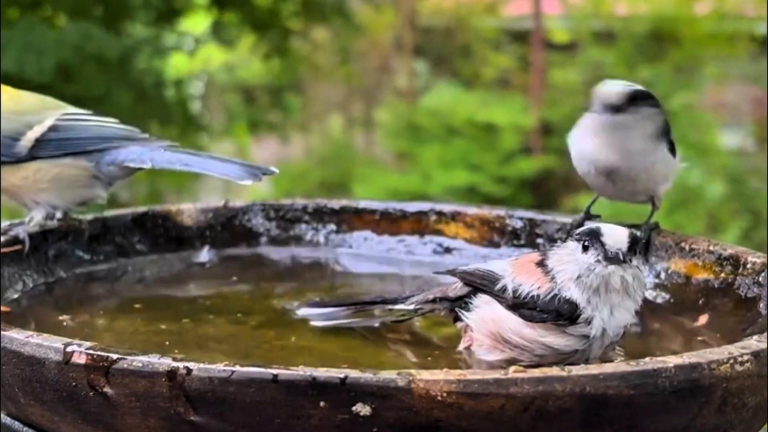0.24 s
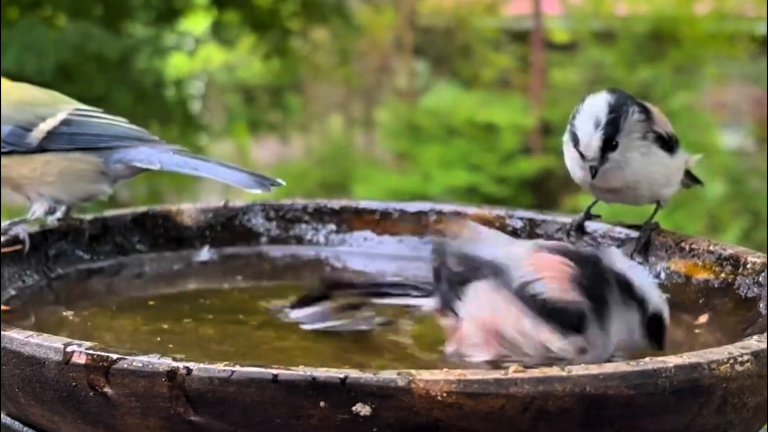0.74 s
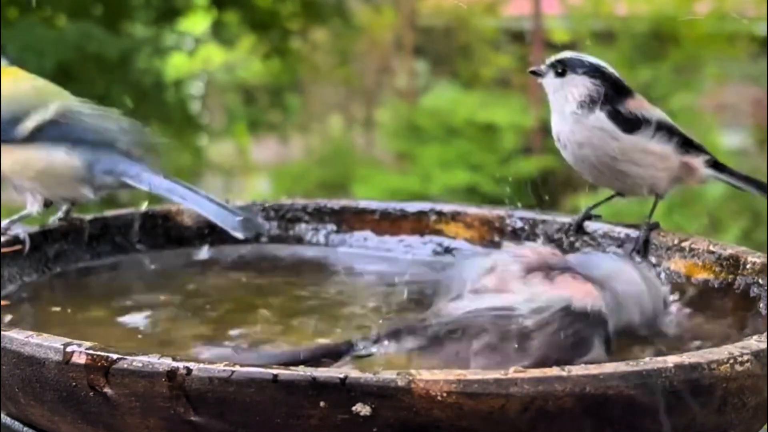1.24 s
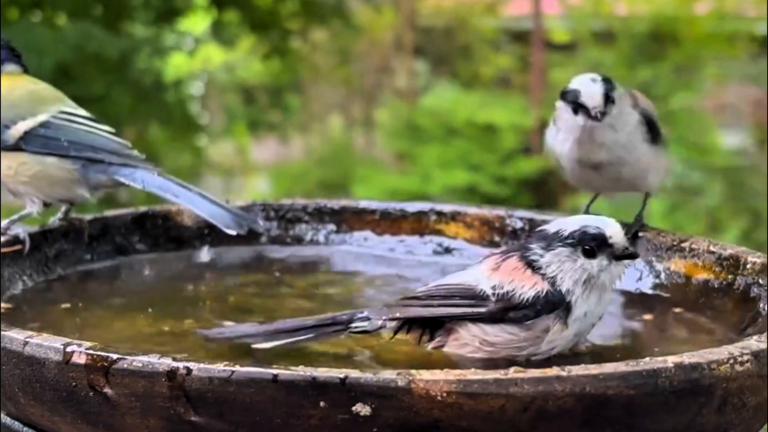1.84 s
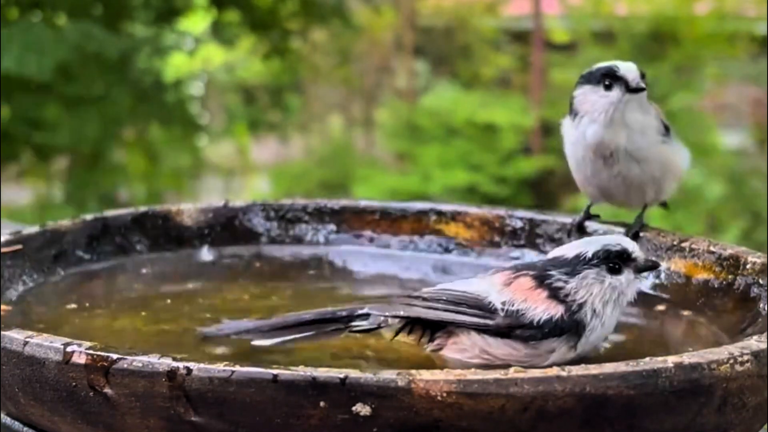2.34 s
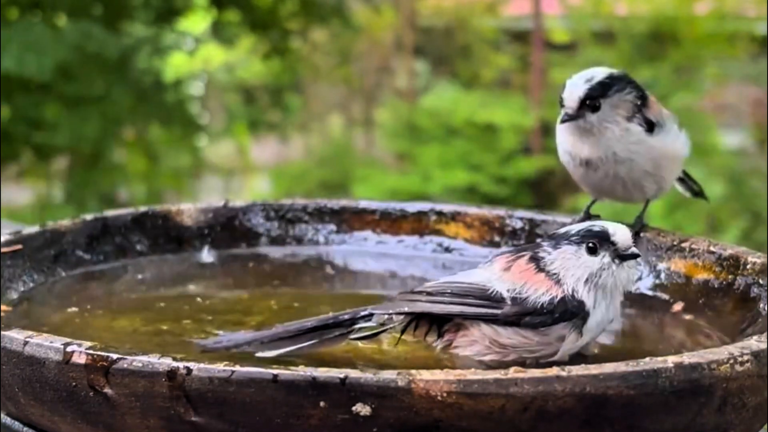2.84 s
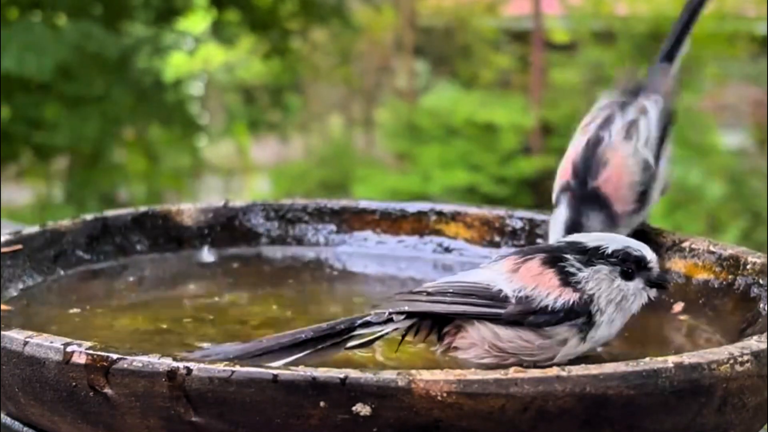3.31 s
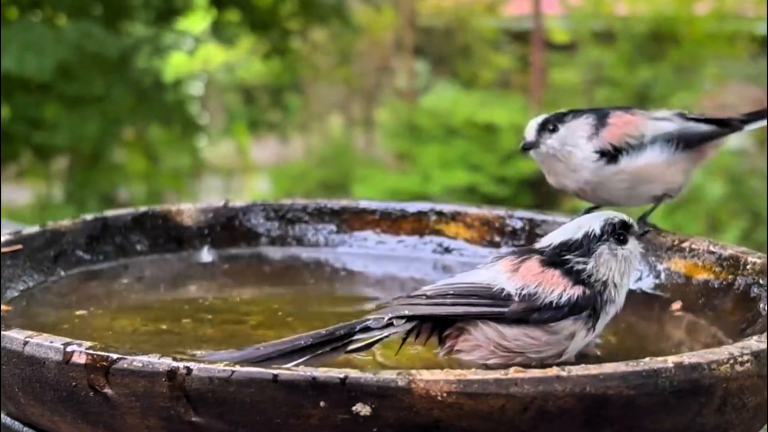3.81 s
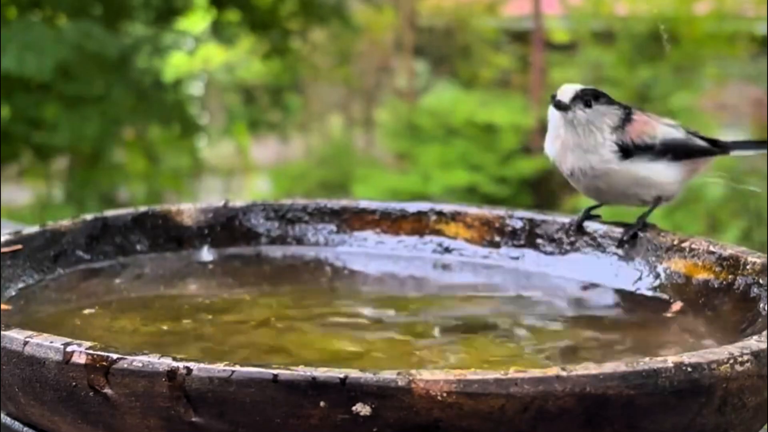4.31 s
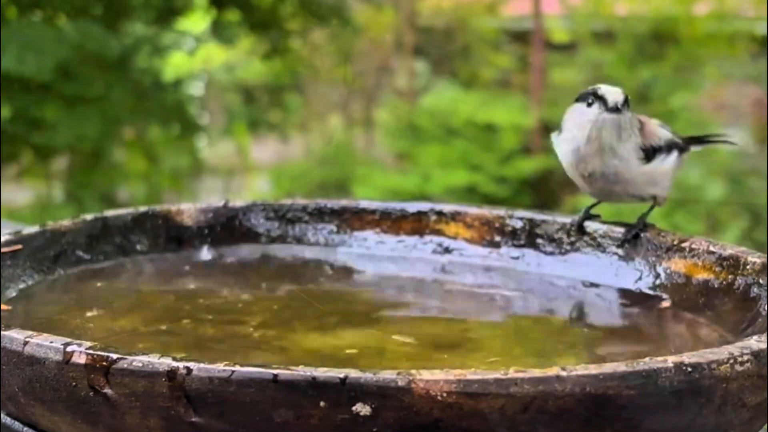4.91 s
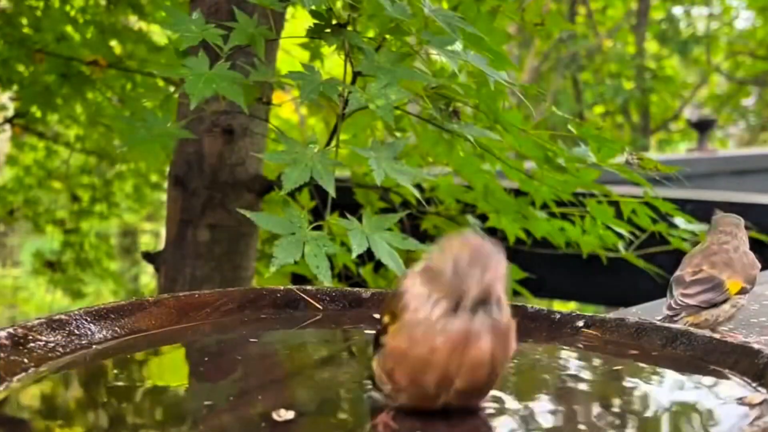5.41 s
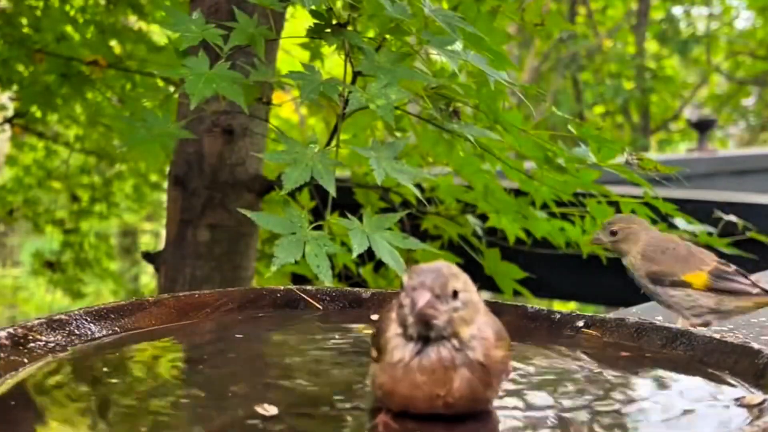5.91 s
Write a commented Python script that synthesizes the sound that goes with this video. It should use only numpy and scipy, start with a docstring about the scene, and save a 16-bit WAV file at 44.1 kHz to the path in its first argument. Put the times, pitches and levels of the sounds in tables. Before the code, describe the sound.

Small songbirds are heard close up at a garden bird bath, over a faint town rumble, soft air and a distant bird chorus. Sharp high chips and thin whistles are scattered through the opening seconds. From about 0.7 seconds a bird splashes, throwing hissing spray and crisp drops. Wings flutter close by at 1.2 seconds and again, with more splashing, around 2.3 seconds. At 3 seconds comes the loudest sound, a clear, very high trill of about a dozen quick notes that falls in pitch and ends near 3.7 seconds. Hoarse, high, distant rasps follow from 3.9 to 5 seconds, while a third flutter passes with spray and drops around 4.3 seconds. Just after 5 seconds the sound drops out for an instant. It returns quieter, with a few light drips and faint whistles until about 6 seconds.

```python
"""Small songbirds at a garden bird bath. Town rumble, air and a far chorus lie under chips and thin whistles.
One bird splashes, throwing hissing spray and cracking drops; wings flap close by at 1.2 s and 2.3 s.
At 3 s comes a loud falling trill, then far rasps and a third flight past the microphone.
Just after 5 s the sound stops for a moment, and a quieter bath is heard."""
import sys
import numpy as np
from scipy import signal
from scipy.fft import rfft, irfft, next_fast_len
from scipy.io import wavfile
from scipy.ndimage import uniform_filter1d, map_coordinates

SR = 44100
rng = np.random.default_rng(int(sys.argv[2]) if len(sys.argv) > 2 else 0)


def log_audio(samples):
    """Write samples as a 16-bit WAV file to the path given in sys.argv[1]."""
    # one column per channel
    frames = np.atleast_2d(samples).T
    # limit to full scale, then quantise
    limited = np.clip(frames, -1, 1)
    pcm = np.round(limited * 32767).astype(np.int16)
    wavfile.write(sys.argv[1], SR, pcm)


N = 271215
TIME = np.arange(N) / SR


def amp(db):
    """Decibels to gain."""
    return 10 ** (np.asarray(db) / 20)


def pan(db):
    """Stereo gains with the left db above the right."""
    return amp([[db / 2], [-db / 2]])


def unit(x):
    """x at rms 1."""
    return x / np.sqrt(np.mean(x ** 2) + 1e-20)


def along(points, hz):
    """Reads a (freq_hz, value) curve on a log frequency axis."""
    freqs, values = np.transpose(points)
    return np.interp(np.log(hz + 1), np.log(freqs + 1), values)


def automation(spans, outside=None):
    """Joins spans of breakpoints into one lane for each column after the time."""
    times, *columns = np.transpose(np.vstack(spans))
    return [np.interp(TIME, times, column, outside, outside) for column in columns]


def wobble(hz, count=N):
    """A smooth random curve with hz knots a second."""
    return map_coordinates(rng.standard_normal(int(count * hz / SR) + 4), [np.arange(count) * hz / SR])


def flutter(hz, count):
    """A wobble of rms 1, for roughening a whistle."""
    return unit(wobble(hz, count))


def filtered(x, response):
    """EQs x with a gain given as a function of frequency."""
    size = next_fast_len(N + SR // 2)
    return irfft(rfft(x, size) * response(np.fft.rfftfreq(size, 1 / SR)), size)[..., :N]


def add(track, start_s, sound):
    """Mixes a sound into a track."""
    room = track[..., round(start_s * SR):][..., :sound.shape[-1]]
    room += sound[..., :room.shape[-1]]


def echoes(x, t60, far_t60, far_db):
    """Leaves and walls scatter a sound: a short tail and a weaker long one, new for each sound."""
    t = np.arange(SR // 2) / SR
    tail = rng.standard_normal((2, len(t))) * (amp(-60 * t / t60) + amp(far_db - 60 * t / far_t60))
    return signal.fftconvolve(x[None], tail / np.linalg.norm(tail[0]), axes=1)


# Stereo image of the noise layers: freq_hz, left_right_correlation
NOISE_IMAGE = [(60, 0.95), (180, 0.85), (550, 0.21), (1650, 0.16), (4970, 0.7), (15000, 0.3)]

def rush(eq, patchy_db, grain=1):
    """Shaped stereo noise of rms 1, its gain varying in random patches of time and frequency."""
    bins = signal.stft(grain * rng.standard_normal((2, N)), nperseg=512)[2]
    patches = uniform_filter1d(rng.standard_normal(bins.shape[1:]), size=6, axis=0)
    patches = unit(uniform_filter1d(patches, size=10, axis=1))
    pair = signal.istft(bins * amp(patchy_db * patches), nperseg=512)[1][:, :N]

    def mid_side_gains(hz):
        angle = np.arccos(np.clip(along(NOISE_IMAGE, hz), -1, 1)) / 2
        return amp(along(eq, hz)) * [np.cos(angle), np.sin(angle)]

    mid, side = filtered(pair, mid_side_gains)
    return unit(np.array([mid + side, mid - side]))


# Tone of the three background beds: freq_hz, gain_db
RUMBLE_EQ = [(15, -22), (25, 0.5), (54, 0), (136, -12), (172, -15), (303, -20), (430, -25.5), (500, -31),
             (650, -59), (1100, -120)]
AIR_EQ = [(200, -33.5), (400, 0), (700, -4), (1200, -11), (2500, -16), (5000, -21.5), (8500, -18),
          (9300, -44), (12000, -30), (16000, -40.5)]
CHORUS_EQ = [(2900, -32), (3450, -3.5), (3700, 0.5), (4000, -5), (4700, -15.5), (5500, -45)]
# Fader rides for the air and the chorus: time_s, level_db
AIR_FADER = [(0, -61), (1.9, -56), (2.5, -63.5), (3, -61), (5.03, -59.5), (5.15, -62), (5.25, -71),
             (5.75, -69), (6.15, -60.5)]
CHORUS_FADER = [(0, -61), (2.3, -61), (2.6, -65.5), (3, -69), (3.3, -63.5), (4.1, -69.5), (4.5, -73.5),
                (5.03, -65), (5.15, -72.5), (6.15, -78.5)]
# Faint far tones: start_s, stop_s, pitch_hz, level_db
FAR_TONES = [(0, 1.67, 463, -63.5), (0, 0.58, 581, -65.5), (0, 1.33, 694, -65), (2.4, 5, 431, -70.5),
             (2.4, 5, 651, -71.5), (2.4, 5, 867, -72), (2.4, 4, 1303, -76), (5.1, 6.0, 1400, -75.5)]
FIRST_BATH_END_S, SECOND_BATH_START_S = 5.031, 5.145

def garden():
    """The bed: town rumble, air, a far chorus band near 3.7 kHz and faint wavering tones."""
    rumble_db = np.where(TIME > FIRST_BATH_END_S, -52, -48.5)
    out = amp(rumble_db + 0.4 * wobble(2.3) + 0.23 * wobble(12)) * rush(RUMBLE_EQ, patchy_db=0.83)
    out += amp(automation([AIR_FADER])[0] + .7 * wobble(5.6)) * rush(AIR_EQ, patchy_db=1.6)
    out += amp(automation([CHORUS_FADER])[0] + 0.45 * wobble(26)) * rush(CHORUS_EQ, patchy_db=3.5)
    for start_s, stop_s, hz, db in FAR_TONES:
        fade = np.clip(np.minimum(TIME - start_s, stop_s - TIME) / 0.058, 0, 1)
        out += fade * amp(db + 1.8 * wobble(3)) * np.sin(2 * np.pi * hz * TIME + .6 * wobble(3.1))
    return out


# Swells of spray, in three spans: time_s, level_db
SPRAY_FADER = [
    [(0, -73), (.15, -65.5), (.45, -98), (.69, -82), (.75, -60), (.9, -53), (1.2, -57), (1.35, -68),
     (1.52, -57.5), (2.1, -61.5), (2.29, -48), (2.45, -61), (2.6, -65.5), (2.74, -75)],
    [(3.85, -75), (3.92, -61.5), (4.1, -54), (4.27, -44.5), (4.4, -53), (4.55, -57), (4.6, -68),
     (4.87, -67), (5, -59.5)],
    [(5.15, -80), (5.8, -90), (6.09, -60)],
]
# Bright fizz of spray and feathers: freq_hz, gain_db
FIZZ_EQ = [(500, -22), (1500, -1), (5000, -2.5), (9000, -4), (13000, -3.5), (16000, -13)]

def spray():
    """Thrown water: hiss made of many tiny spits."""
    spits = amp(2.7 * wobble(700) + 1.764 * wobble(90))
    return amp(automation(SPRAY_FADER)[0]) * rush(FIZZ_EQ, patchy_db=-1.5, grain=spits)


# Chips and thin whistles: start_s, length_s, start_hz, middle_hz, end_hz, level_db, echo_send_db
CALLS = [(0.005, 0.044, 7450, 7550, 7600, -68, -6), (0.126, 0.018, 2600, 7260, 1990, -38, -3),
         (0.263, .07, 8200, 8240, 8040, -61, -2), (.3, 0.073, 5030, 4930, 4800, -65, -3),
         (0.412, 0.034, 4310, 5040, 4580, -58, 2.5), (0.503, 0.053, 6960, 7600, 7400, -59.5, -11),
         (0.635, 0.025, 7200, 9000, 7800, -62, 1), (0.662, 0.0083, 7900, 8900, 7800, -55, 4),
         (0.67, 0.019, 8200, 9000, 6600, -56, -1), (1.152, 0.013, 3800, 7020, 3040, -34, 0.5),
         (1.382, 0.037, 3000, 6900, 6470, -61.5, 13.5), (1.546, 0.015, 3600, 5740, 2950, -41, 2.5),
         (1.219, 0.11, 4310, 4150, 3830, -62, -5), (1.589, 0.054, 8000, 7900, 8050, -57.5, -4),
         (1.654, 0.16, 4300, 4400, 4300, -56, -4.5), (1.814, .04, 8400, 8450, 8300, -78, 19),
         (1.949, 0.024, 3000, 4410, 4250, -49.5, 1.5), (1.993, .05, 4600, 4550, 4240, -56, 0),
         (2.426, 0.052, 7300, 7560, 7350, -69, 13), (2.526, .09, 4750, 4750, 4700, -70, 1),
         (2.597, 0.22, 7450, 7400, 7350, -80.5, 11.5), (4.698, 0.33, 4800, 4680, 4630, -70.5, 8),
         (4.749, 0.28, 2600, 2650, 2500, -68, 2), (4.814, 0.054, 3800, 3934, 3600, -72, 0),
         (4.943, 0.055, 3800, 3660, 3570, -84, -1), (5.15, 0.052, 4600, 4560, 4483, -65.5, -4),
         (5.401, 0.16, 4300, 4600, 4400, -71, -6), (5.781, 0.12, 4600, 4560, 4560, -73.5, -4.5)]

def chirps():
    """Birds further off call in arches of pitch, the farthest mostly echo; wide sweeps are two-voiced."""
    out = np.zeros((2, N))
    for start_s, length_s, start_hz, middle_hz, end_hz, db, echo_db in CALLS:
        count = round(length_s * SR)
        place = np.linspace(-1, 1, count)
        bend = np.sin(np.pi * np.abs(place) / 2) ** 2.3
        pitch = middle_hz + (np.where(place < 0, start_hz, end_hz) - middle_hz) * bend
        pitch *= 1 + 0.015 * flutter(152.3, count)
        phase = 2 * np.pi * np.cumsum(pitch) / SR
        rough = np.clip(0.61 + echo_db / 15, .15, 1)  # distance blurs the tone
        undertone = rough * (middle_hz - start_hz) / 4500 * (1 - place ** 2) ** 2 * np.sin(.55 * phase)
        envelope = amp(db) * np.cos(np.pi * place / 2) ** 0.67 * (1 + .5 * place)
        voice = envelope * (1 + rough * flutter(2770, count)) * (np.sin(phase) + undertone)
        add(out, start_s, voice * pan(3))
        add(out, start_s + 0.0036, amp(echo_db) * echoes(voice, t60=0.1172, far_t60=.5, far_db=-20.5))
    return out


def small_drops(per_second=24):
    """Lesser drops at random moments, riding the spray's level: rows like those of LOUD_DROPS."""
    when, softness, pitch, side, dullness = rng.random((round(per_second * N / SR), 5)).T
    spray_db = automation(SPRAY_FADER)[0][(when * N).astype(int)]
    level_db = spray_db + 13 - 12 * softness
    return np.transpose([when * N / SR, level_db, 1000 * 6 ** pitch, 8 * side - 3, 4 - 14 * dullness])


# The loudest drops and claw ticks: start_s, level_db, ring_hz, pan_db, ring_db
LOUD_DROPS = [(0.2694, -39, 3580, 5, -2), (0.7432, -36, 3560, 1.5, -11), (0.7806, -31.5, 7440, 1.5, -9),
              (0.8365, -27, 1640, 2.5, -9), (0.8684, -26.5, 1190, -1, -0.5), (0.8899, -19, 10230, 4, -6),
              (0.9183, -25.5, 7850, -2, -5.5), (0.9353, -25.5, 3170, -5, -14), (0.9494, -32, 10100, -2, 3),
              (0.9892, -21.5, 4300, 4, 1), (1.06, -30, 7360, 2, -4), (1.0714, -27.5, 7190, 3.5, -12),
              (1.0969, -24, 3540, -1.5, -6.5), (1.1273, -29, 4160, 9, -9), (1.7365, -33, 4360, 0.5, -8),
              (1.7963, -30.5, 2500, 4.5, -5), (2.1316, -26, 880, 5.5, 2), (2.1705, -31, 1050, 5, -4),
              (2.1904, -23.5, 3480, 1.5, -20), (2.2119, -22.5, 4600, 4.5, -11), (2.2508, -27, 4370, 3, -1),
              (2.3989, -30, 4300, 0, -4.5), (2.5621, -36.5, 4880, 9.5, -22), (4.1444, -25.5, 6340, 6, -4.5),
              (4.1644, -27, 970, 3.5, 1), (4.1984, -27.5, 6600, 2.5, -9), (4.2802, -35, 1380, 2, 8),
              (4.365, -30, 1311, 2, 1), (5.1634, -41, 1478, 2, -4.5), (5.3248, -45.5, 3770, -4.5, -6),
              (5.4744, -53.5, 3000, 9, -8), (5.8301, -43, 7700, 1, 5), (5.9664, -41.5, 1070, -1, -4.5),
              (6.0864, -37, 4330, -2.5, -6.5), (6.0955, -44.5, 2070, -0.5, 5)]

def drops():
    """Each drop is a broad crack of a few milliseconds with a brief ring at its own pitch."""
    out, t = np.zeros((2, N)), np.arange(SR // 40) / SR
    for start_s, db, hz, pan_db, ring_db in [*LOUD_DROPS, *small_drops()]:
        ring_envelope = np.exp(-t * max(hz / 5.5, 900)) * (1 - np.exp(-t / .0004))
        ring = amp(ring_db) * np.sin(2 * np.pi * hz * t) * ring_envelope
        burst = rng.standard_normal(len(t) + 1) + 0.96 * rng.standard_normal((2, len(t) + 1))
        crack = (burst[:, 1:] + .15 * burst[:, :-1]) * amp(-60 * t / .014) * (1 - np.exp(-t / .0005))
        add(out, start_s, amp(db) * pan(pan_db) * (ring + 0.33 * crack))
    return out


def pulse(t, rise_s, fall_s):
    """A bell-shaped envelope that peaks at t = 4 ms."""
    return np.exp(-((t - .004) / np.where(t < .004, rise_s, fall_s)) ** 2)


# Fly-bys: nearest_s, flap_db, thump_db, swish_db, swish_fade_db_per_stroke, draught_db, pan_db
FLY_BYS = [(1.218, -42.5, -48, -45.5, 6.5, -35.5, -0.5), (2.34, -38.5, -28, -37, 4.5, -28, 3.5),
           (4.3, -36.5, -42, -38.5, 3, -25, -2)]
# Wingbeats of each fly-by: start_s, rate_hz, stroke_count
WINGBEATS = [(1.122, 27.5, 7), (2.129, 25.2, 7), (4.122, 24.2, 11)]
# Tone of the draught's gust and of the flaps: freq_hz, gain_db
GUST_EQ = [(15, -40), (25, -8.5), (38, -10), (64, -28), (81, 18), (182, -21), (250, 4), (320, -54),
           (550, -120)]
FLAP_EQ = [(88, -25), (150, -2), (270, -3.5), (464, -6.5), (930, -18), (1150, -18), (2100, -29.5),
           (2500, -34.5), (3250, -28), (5500, -120)]
# Partials of the draught's throb: stroke_rate_multiple, level_db
THROB_PARTIALS = [(2, 2.5), (3, -1), (4, -8), (5, -9.5), (6, -17)]
THUMP_HZ, THUMP_S = 453, 0.0027  # hollow clap of air in a downstroke: mid-flight pitch, half length
THUMP_SINK = 0.28  # share of that pitch lost by the last stroke
DRAUGHT_FADE_S, PASS_S = .06, 0.16  # the draught is at half power PASS_S from the nearest moment

def wings():
    """Each stroke thumps, flaps low and swishes high over a whirr and a throbbing draught."""
    out, t = np.zeros((2, N)), np.arange(-.04, .06, 1 / SR)
    gust, flap_noise = rush(GUST_EQ, patchy_db=1.0), rush(FLAP_EQ, patchy_db=2.5)
    centre = flap_noise.mean(axis=0)
    flap_noise = unit(centre + 0.76 * (flap_noise - centre))  # narrows the stereo image
    feathers = rush(FIZZ_EQ, patchy_db=4.5, grain=amp(3.5 * wobble(300)))
    for fly_by, (start_s, rate_hz, count) in zip(FLY_BYS, WINGBEATS):
        nearest_s, flap_db, thump_db, swish_db, fade_db, draught_db, pan_db = fly_by
        flap, thump, swish = np.zeros((3, N))
        for k, place in enumerate(np.linspace(-1, 1, count)):
            at_s = start_s + k / rate_hz + t[0]
            arch_db = -9.5 * place ** 4  # the first and last strokes are softest
            clap_hz = THUMP_HZ * (1 - THUMP_SINK * place) * np.exp(0.11 * rng.standard_normal())
            clap = np.sin(2 * np.pi * clap_hz * t) * pulse(t, THUMP_S, THUMP_S)
            add(thump, at_s, amp(thump_db + arch_db) * clap)
            add(flap, at_s, amp(flap_db + arch_db) * pulse(t, rise_s=.008, fall_s=.013))
            add(swish, at_s, amp(swish_db - fade_db * k) * pulse(t, rise_s=.007, fall_s=.013))
        inside_s = np.minimum(TIME - start_s, start_s + count / rate_hz - TIME)
        fade = np.clip(inside_s / DRAUGHT_FADE_S + .5, 0, 1) ** 2
        draught = fade * amp(draught_db + 2.7 * wobble(10)) / np.hypot(1, (TIME - nearest_s) / PASS_S)
        phase = 2 * np.pi * rate_hz * TIME + 0.88 * wobble(5)
        throb = unit(sum(amp(db + 2.9 * wobble(16)) * np.sin(multiple * phase + 6 * rng.random())
                         for multiple, db in THROB_PARTIALS))
        lows = draught * (0.6 * throb + 0.18 * gust)
        mids = thump + (flap + amp(-18.5) * draught) * flap_noise
        highs = (swish + amp(-27) * draught) * feathers
        out += pan(pan_db) * (lows + mids + highs)
    return out


def short_note(start_s, length_s, top_hz, climb_hz, middle_db, swell_db, round_db):
    """Five contour points of a trill note: it climbs, steepest near the middle, holds its top, then drops."""
    times = start_s + length_s * np.linspace(0, 1, num=5)
    pitch = top_hz - np.array([0.89 * climb_hz, 0.58 * climb_hz, 0.011 * climb_hz, 0, 385.7])
    inner_db = middle_db + np.array([-swell_db - round_db, 0, swell_db - round_db])
    edge_db = inner_db.max() - 10
    return np.transpose([times, pitch, [edge_db, *inner_db, edge_db]])


# Contour of the trill's long first note: time_s, pitch_hz, level_db
OPENING_NOTE = [(2.9917, 6810, -15.2), (2.9997, 6960, -5.2), (3.0078, 7030, -2.1), (3.0159, 7010, -2.4),
                (3.0239, 6650, -5.9), (3.0323, 6610, -7.2), (3.0407, 6790, -4.4), (3.049, 6740, -5.3),
                (3.0574, 6390, -17.1)]
# The falling run after it: start_s, length_s, top_hz, climb_hz, middle_db, swell_db, round_db
TRILL_NOTES = [(3.0812, .0266, 6430, 560, -6.3, 3.2, 1), (3.1385, .0253, 6250, 640, -8.1, .3, 0),
               (3.1854, .0259, 6210, 750, -8.2, -1.6, -.8), (3.2342, .0267, 6150, 900, -7.8, -.7, -1),
               (3.2836, .0257, 6020, 730, -6.3, -1.9, 1), (3.3347, .0267, 5920, 520, -7.4, -1.1, 1.3),
               (3.3863, .0268, 6020, 740, -6.8, -1.7, 2.5), (3.438, .0273, 5930, 620, -7.7, 0, 2.8),
               (3.5007, .0273, 5950, 620, -9.4, .4, 3), (3.5582, .0285, 5860, 590, -8.3, .4, 2.5),
               (3.6174, .0305, 5820, 500, -10.1, 1.5, .6)]
LEFT_LEAD_RAD, BEAK_HZ = .8, 12600  # the left hears the trill first; the beak favours an octave near here

def trill():
    """A clear whistle with a breathy edge and a faint rough octave; each note arches up and snaps shut."""
    out = np.zeros((2, N))
    for note in [OPENING_NOTE] + [short_note(*row) for row in TRILL_NOTES]:
        times, hz, db = np.transpose(note)
        t = np.arange(times[0] - .005, times[-1] + 0.003, 1 / SR)
        count = len(t)
        # the pitch scoops in from below and drops away as the note closes
        pitch = np.interp(t, [t[0], *times, t[-1]], [hz[0] - 650, *hz, hz[-1] - 1000])
        pitch = uniform_filter1d(pitch, size=110)
        envelope = np.interp(t, [times[0] - .002, *times, times[-1] + 0.00067], [0, *amp(db), 0])
        envelope = np.convolve(envelope, np.hanning(90) / np.hanning(90).sum(), "same")
        phase = 2 * np.pi * np.cumsum(pitch) / SR + [[LEFT_LEAD_RAD / 2], [-LEFT_LEAD_RAD / 2]]
        whistle = (1 + amp(-27) * flutter(700, count)) * np.sin(phase)
        breath = amp(-31) * flutter(2200, count) * np.sin(phase)
        breath += amp(-48) * flutter(2500, count) * np.sin(.78 * phase)
        breath += amp(-54.5) * flutter(910, count) * np.sin(phase / 2)
        beak_gain = 1 / (1 + ((2 * pitch - BEAK_HZ) / 800) ** 4)
        octave = amp(-37) * (1 + .7 * flutter(1200, count)) * beak_gain * np.sin(2 * phase)
        voice = envelope * (whistle + breath) + envelope ** .5 * octave
        add(out, t[0], voice * pan(1))
        add(out, t[0] + 0.0057, amp(-15) * echoes(voice[0], t60=0.19, far_t60=0.44, far_db=-19.5))
    return out


# Contours of the two far rasps: time_s, centre_hz, level_db
RASP_CONTOURS = [
    [(3.82, 6690, -78.5), (3.93, 6780, -41.5), (4.1, 6860, -39.5), (4.316, 6100, -52.5),
     (4.434, 6710, -40.5), (4.504, 6710, -42), (4.63, 6600, -69)],
    [(4.66, 6600, -62), (4.744, 5900, -50.5), (4.894, 5824, -52), (5.03, 5605, -56.5)],
]
RASP_HALF_WIDTHS_HZ = (330, 750)

def rasps():
    """Far, hoarse rasps: a band of noise that slides in pitch, with a weaker band about an octave below."""
    out = np.zeros((2, N))
    for contour, half_width_hz in zip(RASP_CONTOURS, RASP_HALF_WIDTHS_HZ):
        phase = 2 * np.pi * np.cumsum(automation([contour])[0]) / SR
        noise = rng.standard_normal((2, 2, N)) + 1.7 * rng.standard_normal((2, 1, N))
        upper, lower = unit(filtered(noise, lambda hz: 1 / (1 + (hz / half_width_hz) ** 2.3)))
        level = amp(automation([contour], outside=-120)[1] + 1.5 * wobble(25))
        out += level * pan(-2) * (upper * np.sin(phase) + amp(-15.5) * lower * np.sin(.48 * phase))
    return out


def scene():
    """Everything at and around the bath."""
    return garden() + spray() + chirps() + drops() + wings() + trill() + rasps()


CEILING, LOW_CUT_HZ, HIGH_CUT_HZ = .93, 36, 15900

def record(dry):
    """Master chain: soft clip, a gate that dips to silence between the two baths, low and high cuts."""
    clipped = dry / (1 + np.abs(dry / CEILING) ** 10) ** (1 / 10)
    close_s, open_s = FIRST_BATH_END_S, SECOND_BATH_START_S
    gate_times = [close_s - .002, close_s, close_s + 0.037, open_s - .004, open_s]
    gated = clipped * amp(np.interp(TIME, gate_times, [1, -2, -58, -89, -1]))
    return filtered(gated, lambda hz: (hz < HIGH_CUT_HZ) * hz ** 4 / (hz ** 4 + LOW_CUT_HZ ** 4))


dry = scene()
out = record(dry)
log_audio(out)
```